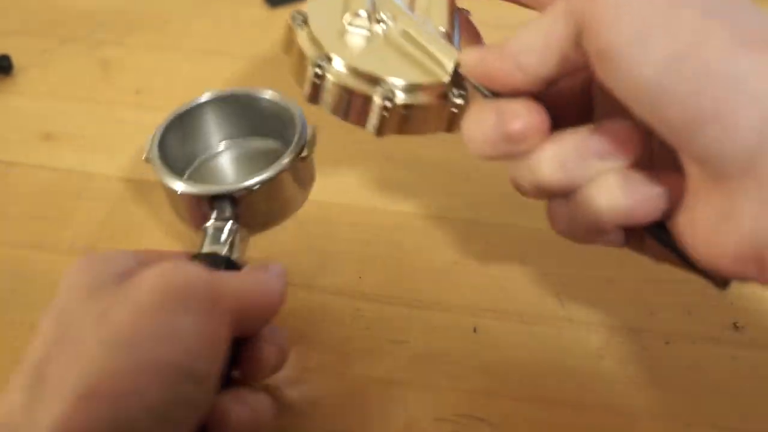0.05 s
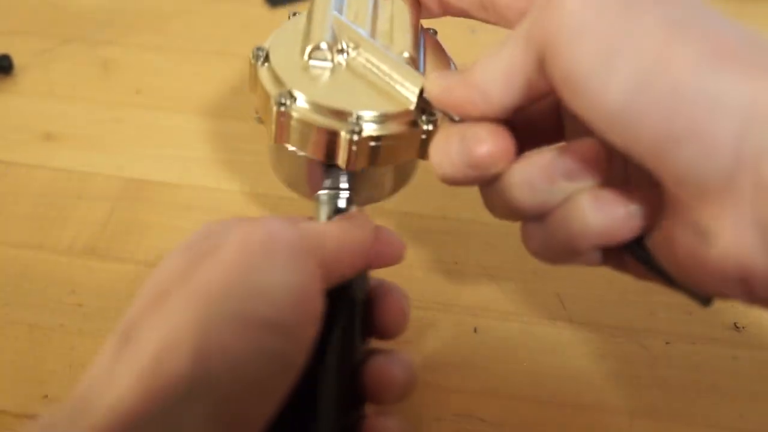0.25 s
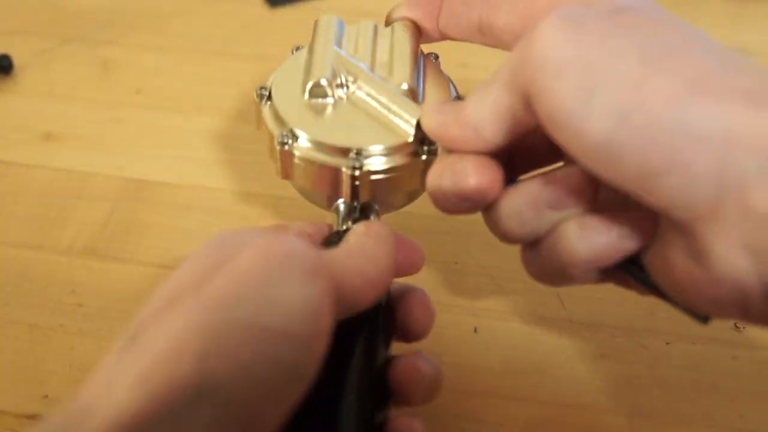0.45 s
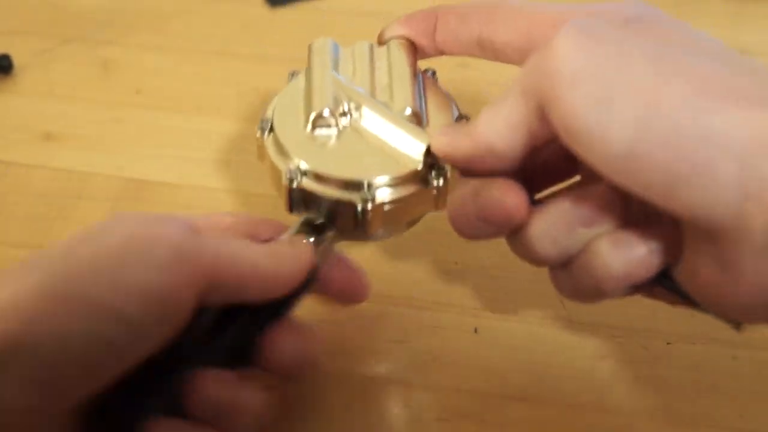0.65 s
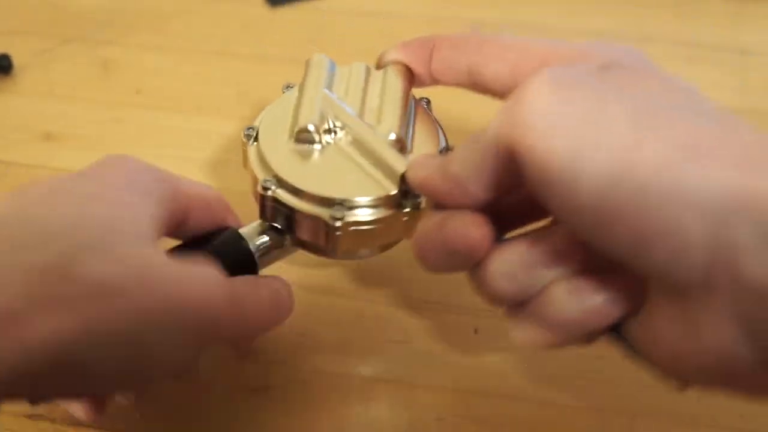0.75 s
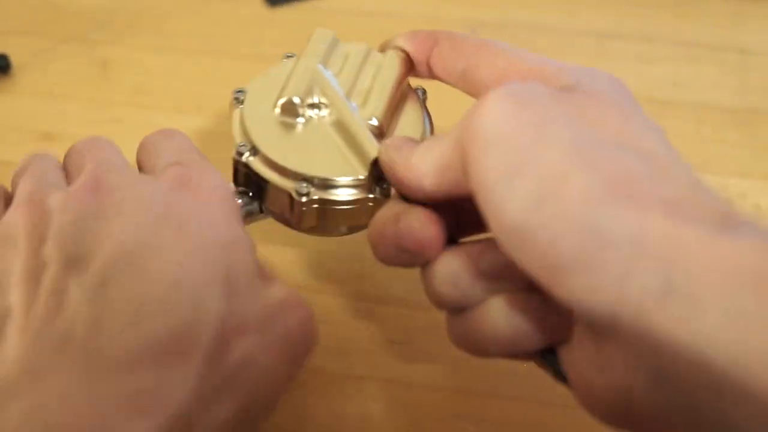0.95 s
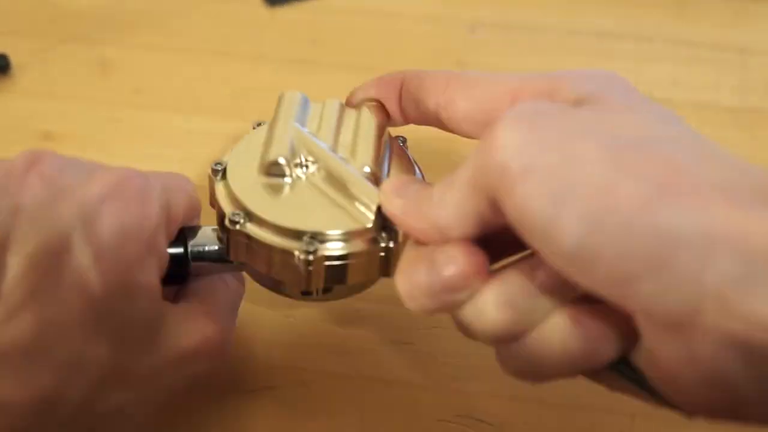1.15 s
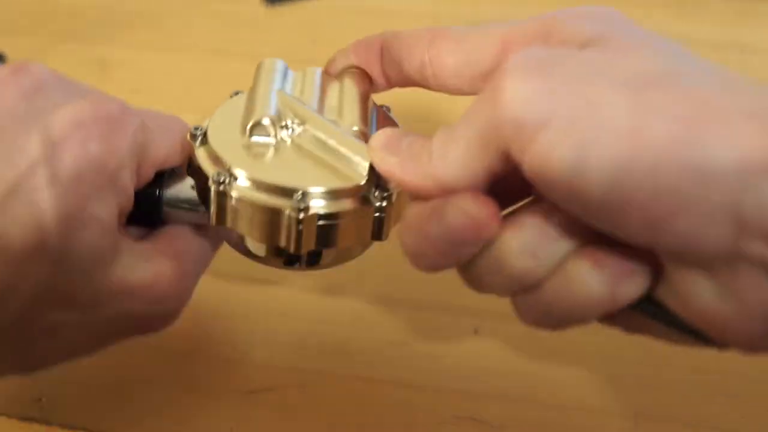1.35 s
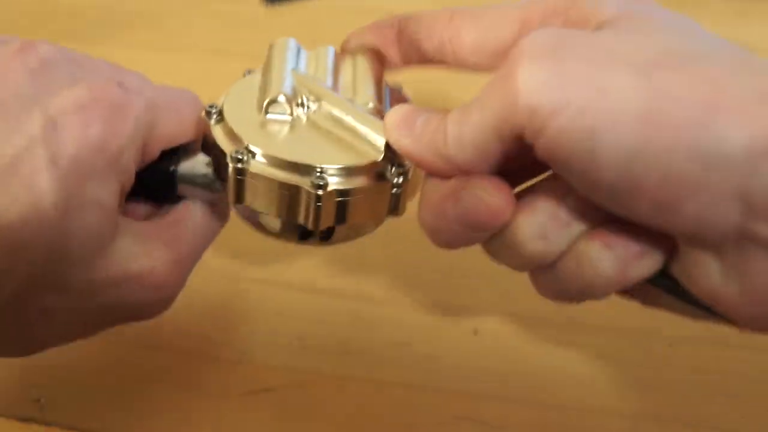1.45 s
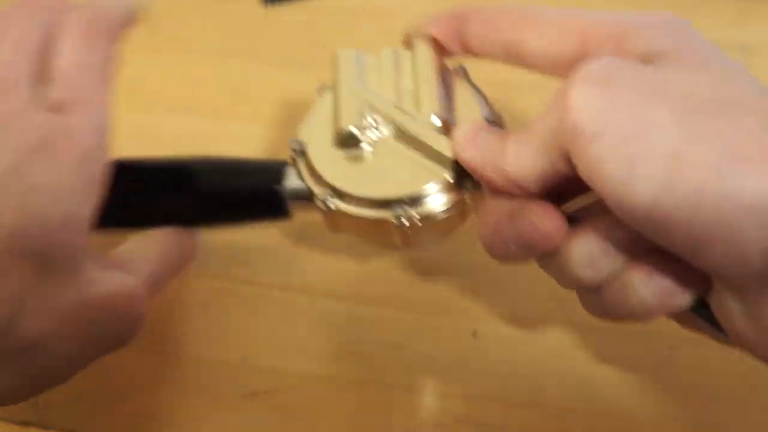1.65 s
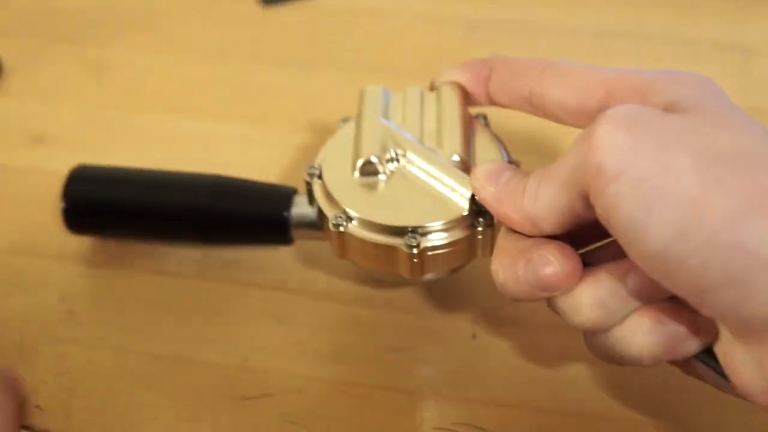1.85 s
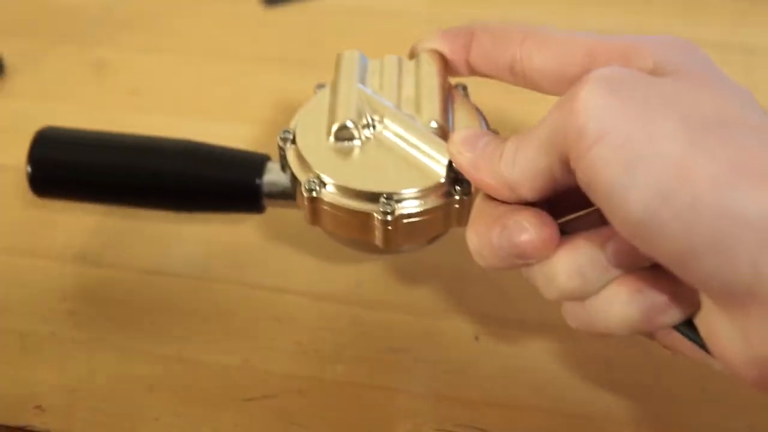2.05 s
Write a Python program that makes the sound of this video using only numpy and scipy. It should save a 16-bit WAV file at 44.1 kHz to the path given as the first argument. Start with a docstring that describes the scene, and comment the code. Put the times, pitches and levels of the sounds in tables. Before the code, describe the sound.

Metal clanks as an espresso filter holder is fitted, twisted squeakily tight and clunks.

```python
"""Locking a portafilter

A steel portafilter slides into a hand-held metal brew head with a thin friction whistle, clanks and
scrapes on the rim, catches and drops into its seat. Twisted tight, it rubs and squeals on the gasket,
then ends with a ringing clunk. Each impact excites a brief, dense clatter; the main ones also ring
in decaying normal modes. A small live room reverberates and hums quietly."""
import sys
import numpy as np
from scipy import signal
from scipy.fft import rfft, irfft
from scipy.io import wavfile
from scipy.ndimage import uniform_filter1d

SR = 44100
rng = np.random.default_rng(int(sys.argv[2]) if len(sys.argv) > 2 else 0)


def dump(signal):
    """Clip the signal to [-1, 1] and save it as 16-bit WAV at the path in sys.argv[1]."""
    limited = np.clip(np.atleast_2d(signal).T, -1, 1)
    pcm = np.round(limited * 32767).astype(np.int16)
    wavfile.write(sys.argv[1], SR, pcm)


N = 92610
T, HZ = np.arange(N) / SR, np.maximum(np.fft.rfftfreq(N, 1 / SR), 1)

# Spectra of room air, reverberation and stereo side signal (frequency [Hz], relative level [dB])
AIR_SPECTRUM = [(25, -54), (55, -24.5), (100, -25.5), (145, -10), (200, -8.5), (290, -7.5), (450, -2.5),
                (630, -13.5), (950, -9), (2500, -16.5), (6000, -25), (9700, -22), (16000, -23.5)]
ROOM_SPECTRUM = [(200, 0), (1000, 0.5), (4500, -2), (9000, -4), (16000, -1.5)]
SIDE_SPECTRUM = [(60, -5.5), (250, -22), (700, -7), (1500, -7.5), (4500, -1), (9000, -4.5), (14000, -27)]
# Reverberation time (frequency [Hz], T60 [s])
REVERB_TIMES = [(250, 0.64), (1000, 0.61), (4000, 0.51), (8000, 0.37), (14000, 0.46)]
# Noise-driven resonances (frequency [Hz], width [Hz], relative level [dB])
HUM_RESONANCES = [(289, 18.4, -51), (383.6, 37, -58.5)]
GASKET_RESONANCES = [(1924, 93, -11), (3800, 760, -5)]
# Envelopes of the hum and the friction noises (time [s], relative level [dB])
HUM_ENVELOPE = [(0, -4), (.25, -7), (.55, 1), (2.2, -1)]
SLIDE_HISS_ENVELOPE = [(0, -56), (.09, -51), (.13, -56), (.17, -66), (.24, -74)]
RIM_SCRAPE_ENVELOPE = [(.25, -37), (.3, -30), (.36, -25.5), (.41, -71)]
LUG_SCRAPE_ENVELOPE = [(.586, -30), (.61, -39), (.636, -54)]
TWIST_ENVELOPE = [(.99, -56), (1.06, -55.5), (1.1, -42.5), (1.25, -44), (1.41, -46.5), (1.435, -66),
                  (1.52, -89), (1.55, -57), (1.68, -69)]
# Whistles on entering and on leaving the rim; gasket squeals (time [s], frequency [Hz], level [dB])
ENTRY_WHISTLE = [(0, 13050, -55), (.06, 13350, -53), (.115, 13100, -53), (.16, 12330, -52),
                 (.25, 12000, -54)]
LEAVING_WHISTLE = [(.38, 14600, -58), (.425, 13500, -55), (.46, 12200, -64)]
LOW_SQUEAL = [(1.24, 4900, -64), (1.41, 4960, -52.5), (1.47, 4960, -73)]
MID_SQUEAL = [(1.09, 6950, -56), (1.19, 7200, -53), (1.24, 7180, -45), (1.305, 7090, -57), (1.4, 7020, -47),
              (1.44, 7020, -66)]
HIGH_SQUEAL = [(1.09, 11700, -58), (1.22, 11400, -50), (1.32, 11850, -54), (1.42, 11850, -52)]
# Partials of the entry whistle (frequency ratio [1], relative level [dB])
WHISTLE_PARTIALS = [(.627, -7), (.715, -11), (.872, -10), (1, -2), (1.122, -10)]
# Spectra of the gasket hiss and of each contact's clatter (frequency [Hz], relative density [dB])
GASKET_SPECTRUM = [(400, -7.5), (1000, 6), (2500, 4), (4600, 4), (6000, 7.5), (8000, 3.5), (9600, 5),
                   (13000, 3), (16000, 2)]
GRIP_SPECTRUM = [(120, -16), (280, 10.5), (450, -1), (1000, -10), (4000, -35), (16000, -24)]
BUMP_SPECTRUM = [(400, -22), (950, 3), (1900, -1), (3000, -16), (12000, -42)]
TICK_SPECTRUM = [(300, -35), (1000, -14), (2000, -2), (8000, -2.5), (10500, 4), (16000, -5)]
LUG_SPECTRUM = [(200, -46), (900, -7), (1500, 12), (3000, 3.5), (4400, 11.5), (5500, -5), (10000, 6),
                (16000, -21)]
RIM_SPECTRUM = [(200, -65), (600, -50), (800, 2), (1100, -9.5), (1700, 3), (3000, -8), (4300, 0.5),
                (6000, -5.5), (10000, -6), (16000, -20.5)]
SEAT_SPECTRUM = [(200, -37), (650, -17), (950, 6), (1500, 2), (3100, 1), (3700, -4), (4500, 0),
                 (5400, -7.5), (7500, 0.5), (11000, -12), (16000, -19)]
STOP_SPECTRUM = [(150, -17), (280, 0.5), (560, -12.5), (800, 2), (1600, -5.5), (2300, 0.5), (3000, -20),
                 (4400, -13), (7500, -36), (9800, -20.5), (16000, -48)]
# Impacts at each contact (time [s], relative level [dB])
GRIP_IMPACTS = [(.86, -10.5), (.943, -21.5), (1.56, -21), (2.05, -22)]
BUMP_IMPACTS = [(.2935, -12.5), (.3315, -9), (.828, -16.5), (.837, -13), (.849, -21)]
TICK_IMPACTS = [(.2478, -2), (.2738, -5), (.349, -19), (.989, -10.5)]
LUG_IMPACTS = [(.5865, -21), (.595, -2.5)]
RIM_IMPACTS = [(.2475, 0), (.2515, 1.5), (.2555, -5), (.2735, -1), (.281, -25), (.341, -19)]
SEAT_IMPACTS = [(.6362, 3), (.6445, -4.5)]
STOP_IMPACTS = [(1.723, 0.37)]
# Normal modes of the metal at each contact (frequency [Hz], relative level [dB], T60 [s])
LUG_RING = [(2162, -11, 0.08), (4220, -11.5, 0.039), (4470, -10, 0.063), (6450, -9, 0.022)]
RIM_RING = [(824, -15, .4), (1701, -12, .2), (2089, -14, .3), (2602, -11, .1), (3984, -9, .26),
            (4385, 0, .52), (4425, 3, .07), (7413, -5, .3), (12738, -8, .3)]
SEAT_RING = [(282, -20, 0.29), (915.5, 3.5, 0.27), (1090, 8, 0.11), (1212, -3.5, 0.23), (2312, 4.5, 0.27),
             (3095, 19.5, 0.027), (3120, -7, 0.19), (4330, 17, 0.035), (4380, 0.5, 0.49), (4530, -1, .06),
             (6250, 0, .04), (7117, -19, 0.69)]
STOP_RING = [(254.6, -7.5, 0.64), (391.2, -15.5, 0.51), (792, -19.5, 0.91), (1014, -19.5, 0.72),
             (1592, 2, 0.054), (1701, -21, 0.3), (1964, -11.5, 0.42), (2323, 3, 0.18), (2342, -2.5, 0.5),
             (4340, -18, 0.34)]


def amp(db):
    """Amplitude ratio of a level in decibels."""
    return 10 ** (np.asarray(db) / 20)


def unit(x):
    """Normalisation to unit rms."""
    return x / np.sqrt(np.mean(x ** 2))


def over_hz(points, hz=HZ):
    """Interpolation on a logarithmic frequency axis."""
    frequencies, values = np.array(points).T
    return np.interp(np.log(hz), np.log(frequencies), values)


def envelope(points):
    """Amplitude envelope, linear in decibels between its points and silent outside them."""
    times, db = np.array(points).T
    return amp(np.interp(T, times, db)) * (T >= times[0]) * (T <= times[-1])


def convolve(sound, response):
    """A linear system's output is its input convolved with its impulse response."""
    return signal.fftconvolve(np.atleast_2d(sound), np.atleast_2d(response), axes=1)[:, :N]


def noise(gain, side_db=0):
    """Spectrally shaped stereo noise; the side signal lowers the coherence between channels."""
    mid, side = rfft(rng.standard_normal((2, N))) * gain
    side = side * amp(over_hz(SIDE_SPECTRUM) + side_db)
    return unit(irfft(np.array([mid + side, mid - side]), N))


def resonance(hz, width_hz):
    """Lorentzian gain curve about a centre frequency."""
    return 1 / (1 + ((HZ - hz) / (.7 * width_hz)) ** 2)


def resonant_noise(resonances):
    """Randomly driven resonances each give a band of noise."""
    return sum(amp(db) * noise(resonance(hz, width)) for hz, width, db in resonances)


def background(air_db=-53.5):
    """Broadband room air and a low hum, which wavers as narrow-band noise does."""
    air = amp(air_db) * noise(amp(over_hz(AIR_SPECTRUM)), side_db=4)
    return air + resonant_noise(HUM_RESONANCES) * envelope(HUM_ENVELOPE)


def diffuse_field(decay, passes=3):
    """Diffuse field: two streams of dense echoes that favour no pitch under the given decay."""
    echoes = rng.standard_normal((2, N))
    for _ in range(passes):
        phase = np.angle(rfft(echoes * decay))
        echoes = irfft(np.exp(1j * phase), N)  # flat spectrum
        power = np.abs(uniform_filter1d(echoes ** 2, size=512))
        echoes = echoes / np.sqrt(power + 1e-18)  # flat envelope
    return echoes


def room_response(build_s=.00835):
    """Reverberation builds up, then decays exponentially in each octave, faster in the treble."""
    build = 1 - np.exp(-T / build_s)
    typical_t60 = REVERB_TIMES[2][1]
    echoes = diffuse_field(build * amp(-60 * T / typical_t60))
    mid, side = rfft(echoes) * amp(over_hz(ROOM_SPECTRUM))
    side = side * amp(over_hz(SIDE_SPECTRUM))
    octaves, tail = np.geomspace(125, 16000, 8), 0
    for hz, share in zip(octaves, np.eye(len(octaves))):
        band = np.array([mid + side, mid - side]) * np.interp(np.log(HZ), np.log(octaves), share)
        tail = tail + irfft(band, N) * amp(-60 * T / over_hz(REVERB_TIMES, hz))
    return unit(tail * build) / np.sqrt(N)


def in_room(direct, room, reverb_db):
    """Superposition of the direct and reverberant fields."""
    return direct + amp(reverb_db) * convolve(direct, room)


def sweep(track):
    """Phase and envelope of a gliding tone; phase is the integral of frequency."""
    times, hz, db = np.array(track).T
    phase = 2 * np.pi * np.cumsum(np.interp(T, times, hz)) / SR
    return phase, envelope(np.c_[times, db])


def squeal(track, width_hz):
    """A drifting friction resonance: slow noise modulates two carriers in quadrature."""
    phase, gain = sweep(track)
    band = resonance(0, width_hz)
    return (noise(band) * np.cos(phase) + noise(band) * np.sin(phase)) * gain


def slide(roughness=.5):
    """Sliding friction gives an inharmonic whistle that starts hissy, then clears and sinks."""
    phase, gain = sweep(ENTRY_WHISTLE)
    whistle = 0
    for ratio, db in WHISTLE_PARTIALS:
        flutter = 1 + roughness * noise(resonance(0, width_hz=220))
        whistle = whistle + amp(db) * flutter * np.sin(ratio * phase)
    hiss = noise(resonance(hz=13100, width_hz=1400)) * envelope(SLIDE_HISS_ENVELOPE)
    return whistle * gain + hiss + squeal(LEAVING_WHISTLE, width_hz=330)


def gasket(room, hiss_db=-2):
    """Friction of steel on the seal drives hiss, resonances and squeals that drift as it tightens."""
    rub = amp(hiss_db) * noise(amp(over_hz(GASKET_SPECTRUM))) + resonant_noise(GASKET_RESONANCES)
    squeals = squeal(LOW_SQUEAL, width_hz=260) + squeal(MID_SQUEAL, width_hz=85)
    squeals += squeal(HIGH_SQUEAL, width_hz=450)
    return in_room(rub * envelope(TWIST_ENVELOPE) + squeals, room, reverb_db=-8.5)


def radiate(vibration, cutoff_hz=283):
    """Parts much smaller than the wavelength radiate poorly, so deep bass is lost."""
    return signal.sosfilt(signal.butter(3, cutoff_hz, "high", fs=SR, output="sos"), vibration)


def clatter(spectrum, t60):
    """Densely overlapping modes respond to an impulse as a decaying burst of noise."""
    burst = noise(amp(over_hz(spectrum)), side_db=-1) * amp(-60 * T / t60)
    return radiate(unit(burst)) / np.sqrt(N)


def strike(impacts, spectrum, t60):
    """The response depends on the point struck, so each impact has its own clatter."""
    out = np.zeros((2, N))
    for time, db in impacts:
        start = int(time * SR)
        out[:, start:] += amp(db) * clatter(spectrum, t60)[:, :N - start]
    return out


def scrape(levels, spectrum, t60, slips_per_s=290, spread_db=7):
    """Stick-slip friction: random, uneven impulses excite the clatter of the metal."""
    slips = rng.random(N) < slips_per_s / SR
    strengths = amp(spread_db * np.clip(rng.standard_normal(N), -2, 2))
    force = unit(slips * strengths * rng.choice([-1, 1], N)) * envelope(levels)
    return convolve(force, clatter(spectrum, t60))


def ring(impacts, modes, gain_db, left_lead_s=.00002):
    """Free vibration: each impact starts a sum of damped sinusoids, one for each mode."""
    force = np.zeros(N)
    for time, db in impacts:
        force[int(time * SR)] += amp(db)
    stereo_time = T + np.array([[left_lead_s], [0]])
    tones = sum((-1) ** k * amp(db - 60 * T / t60) * np.sin(2 * np.pi * hz * stereo_time)
                for k, (hz, db, t60) in enumerate(modes))
    return amp(gain_db) * convolve(force, radiate(unit(tones)) / np.sqrt(N))


def grip(room):
    """Soft contact excites mainly low frequencies: dull knocks as the hand shifts on the handle."""
    return in_room(strike(GRIP_IMPACTS, GRIP_SPECTRUM, t60=.18), room, reverb_db=-6)


def bumps(room):
    """Blunt contact excites the midrange: the lugs clack over the rim and settle in their slots."""
    return in_room(strike(BUMP_IMPACTS, BUMP_SPECTRUM, t60=.029), room, reverb_db=-7)


def ticks(room):
    """Brief contact excites the treble: steel edges snap at the rim and as the twist begins."""
    return in_room(strike(TICK_IMPACTS, TICK_SPECTRUM, t60=.014), room, reverb_db=-3.5)


def lugs(room, t60=.023):
    """Impact and friction with heavy damping: the lugs catch and slide toward their slots."""
    contact = strike(LUG_IMPACTS, LUG_SPECTRUM, t60) + scrape(LUG_SCRAPE_ENVELOPE, LUG_SPECTRUM, t60)
    ringing = ring(LUG_IMPACTS, LUG_RING, gain_db=2.5)
    return in_room(contact + ringing, room, reverb_db=-3)


def rim(room, t60=.058):
    """Repeated impact and friction: the basket chatters on the rim, rings and scrapes along it."""
    contact = strike(RIM_IMPACTS, RIM_SPECTRUM, t60) + scrape(RIM_SCRAPE_ENVELOPE, RIM_SPECTRUM, t60)
    ringing = ring(RIM_IMPACTS, RIM_RING, gain_db=.5)
    return in_room(contact, room, reverb_db=-3) + in_room(ringing, room, reverb_db=-.5)


def seat(room):
    """Impulsive excitation: the basket drops home with a double impact that rings its modes."""
    contact = strike(SEAT_IMPACTS, SEAT_SPECTRUM, t60=.029)
    ringing = ring(SEAT_IMPACTS, SEAT_RING, gain_db=3.5)
    return in_room(contact, room, reverb_db=0) + in_room(ringing, room, reverb_db=-10)


def stop(room):
    """Lightly damped modes ring on after the locked assembly clunks as the handle is let go."""
    contact = strike(STOP_IMPACTS, STOP_SPECTRUM, t60=.067)
    ringing = ring(STOP_IMPACTS, STOP_RING, gain_db=3.5)
    return in_room(contact, room, reverb_db=-3.5) + in_room(ringing, room, reverb_db=-6.5)


def scene():
    """Linear superposition: contacts and gasket share one room; slide and background add directly."""
    room = room_response()
    contacts = rim(room) + lugs(room) + seat(room) + ticks(room) + bumps(room) + grip(room) + stop(room)
    return contacts + gasket(room) + slide() + background()


def record(dry, cutoff_hz=15900):
    """Band limiting: a steep elliptic low-pass removes the highest treble."""
    return signal.sosfilt(signal.ellip(10, .2, 70, cutoff_hz, fs=SR, output="sos"), dry)


dry = scene()
out = record(dry)
dump(out)
```